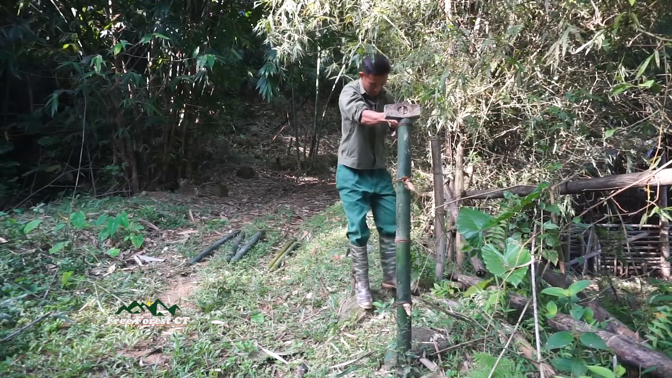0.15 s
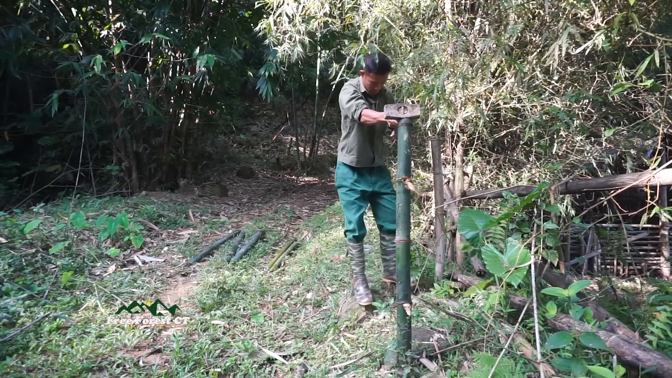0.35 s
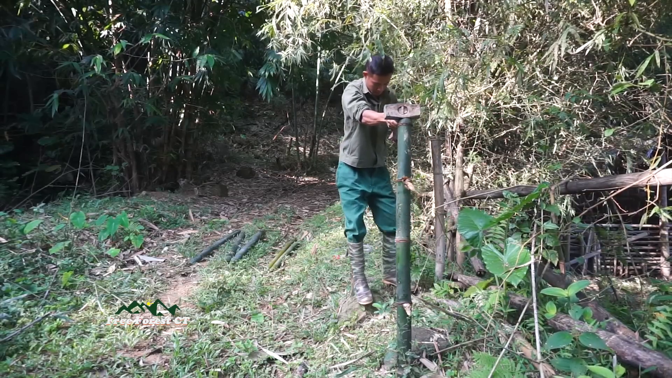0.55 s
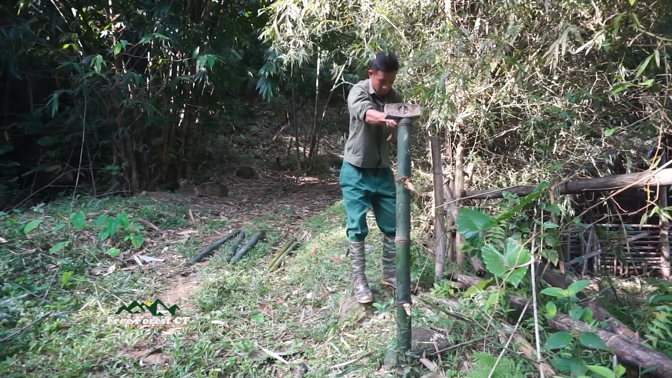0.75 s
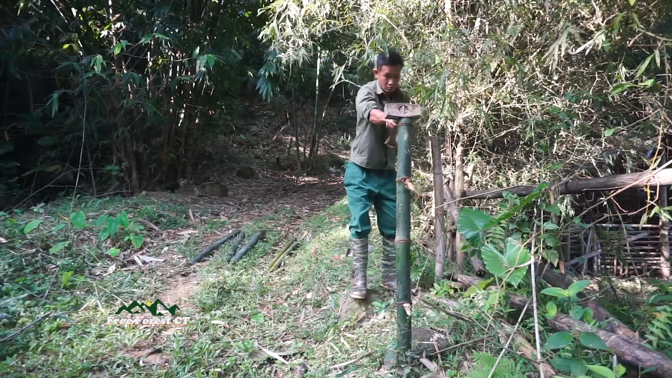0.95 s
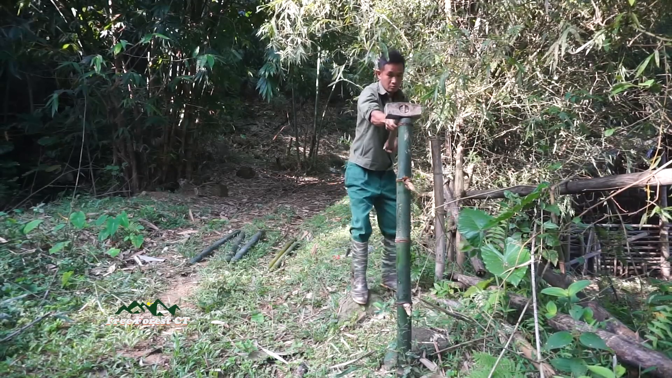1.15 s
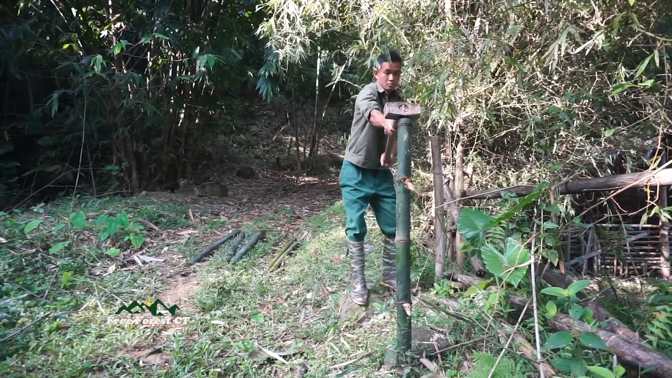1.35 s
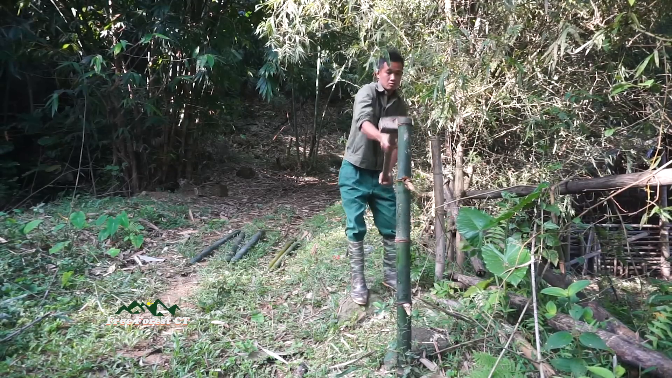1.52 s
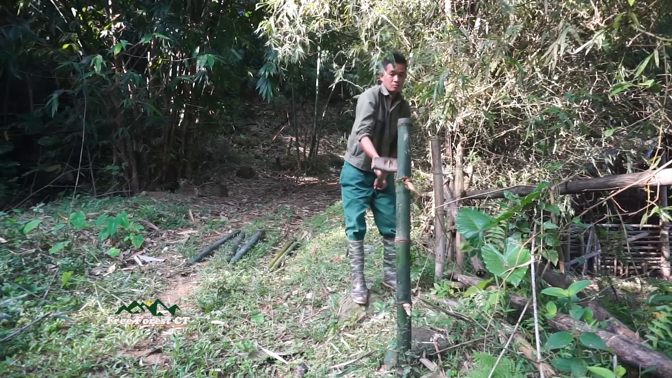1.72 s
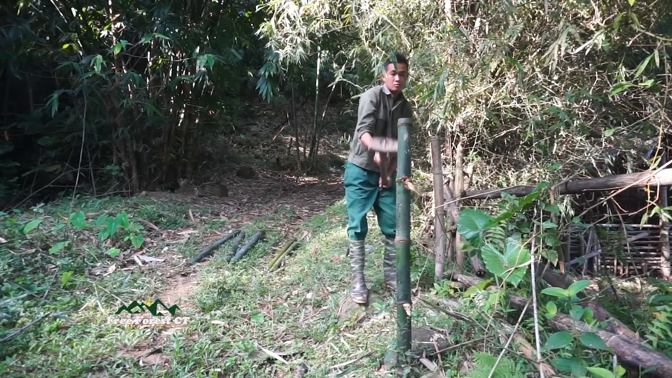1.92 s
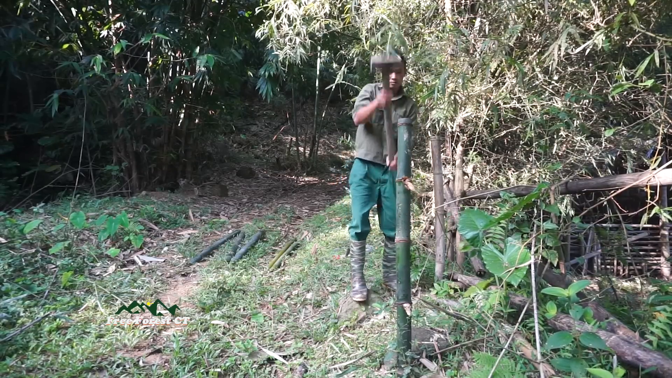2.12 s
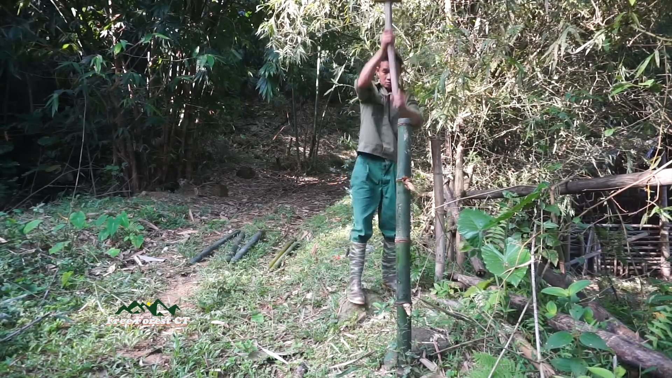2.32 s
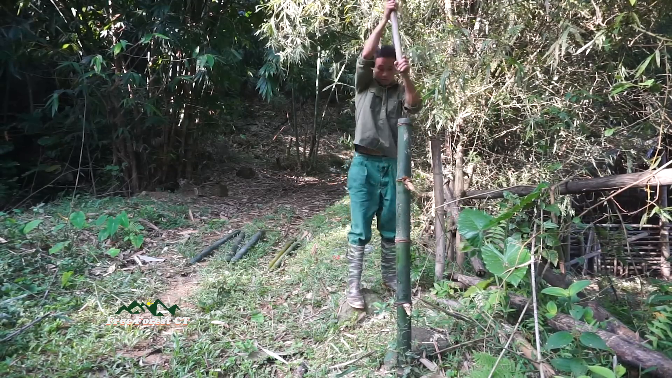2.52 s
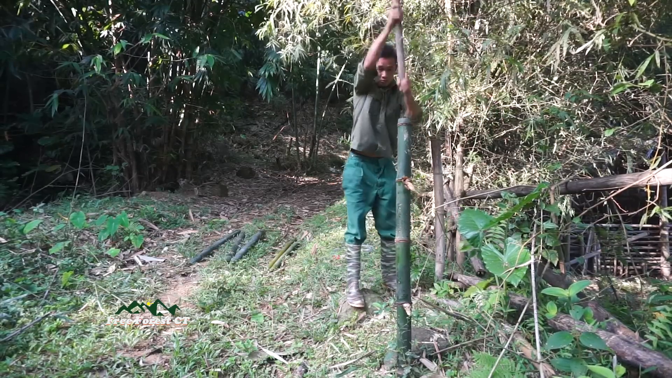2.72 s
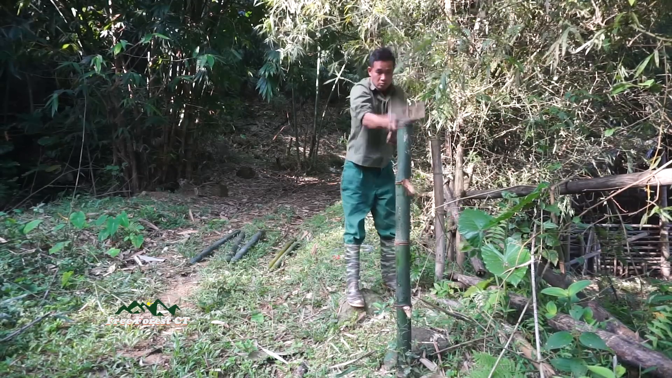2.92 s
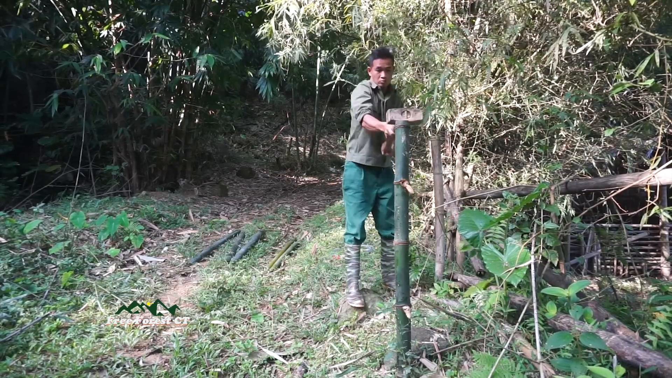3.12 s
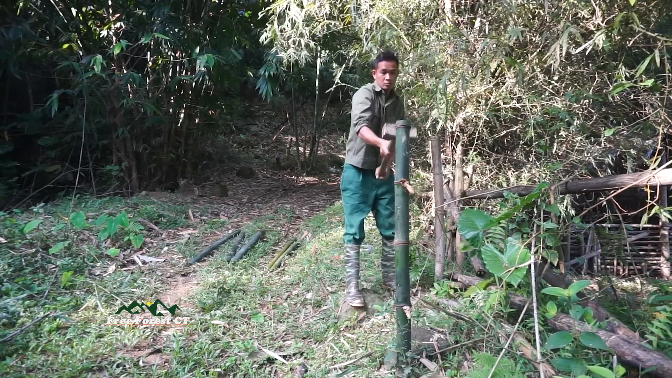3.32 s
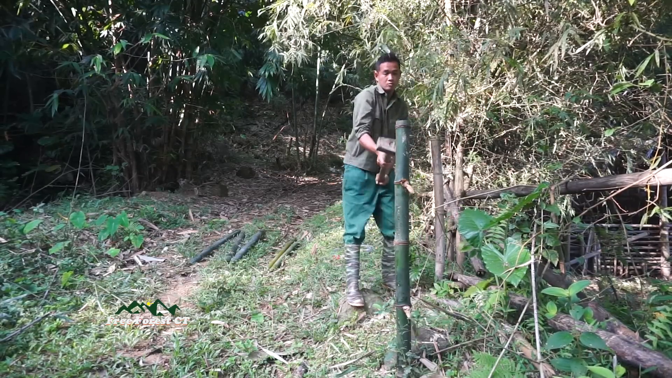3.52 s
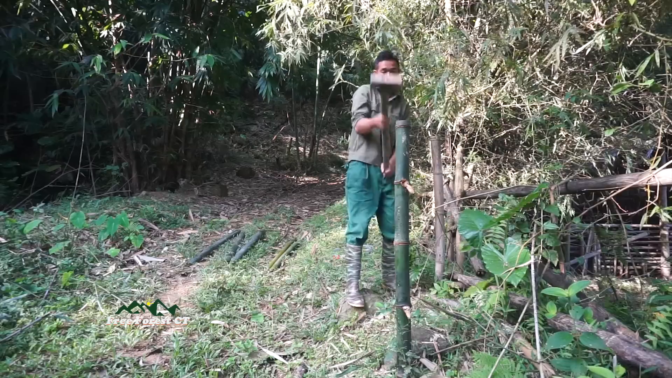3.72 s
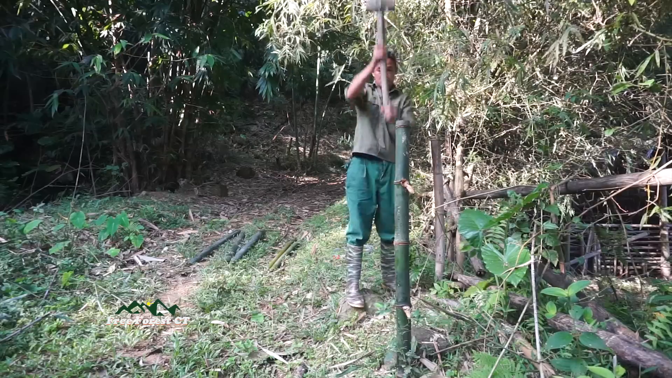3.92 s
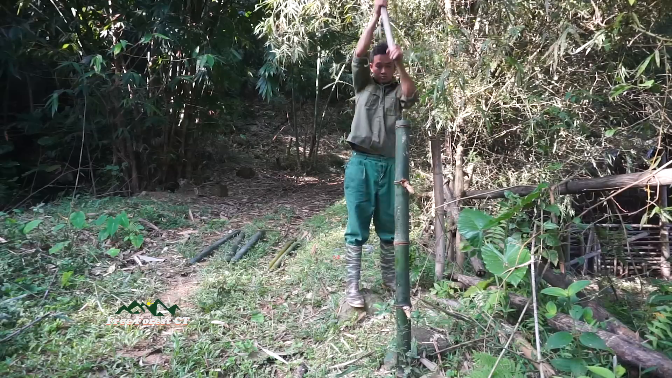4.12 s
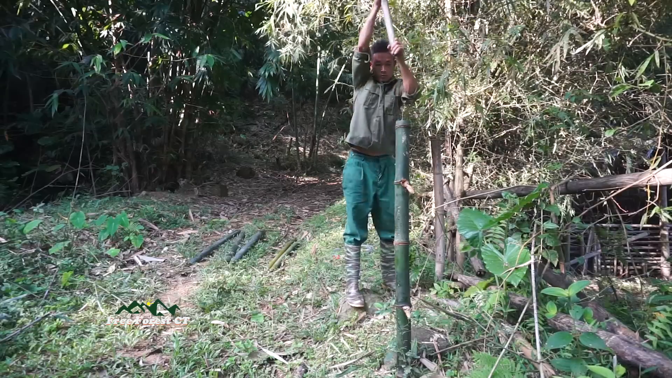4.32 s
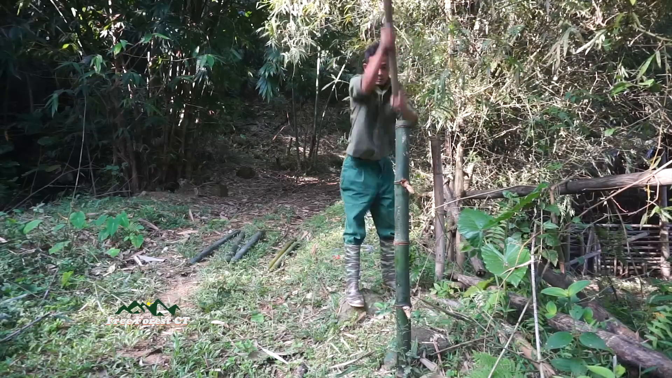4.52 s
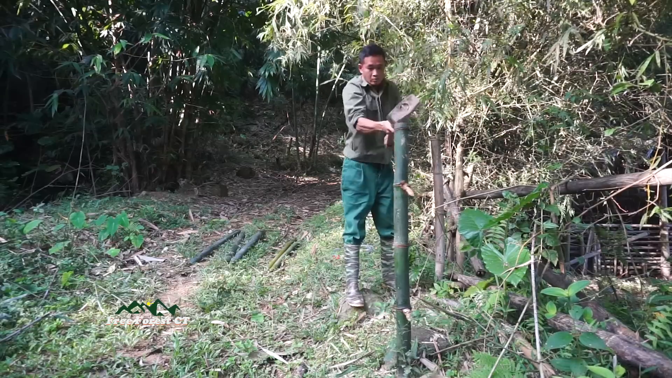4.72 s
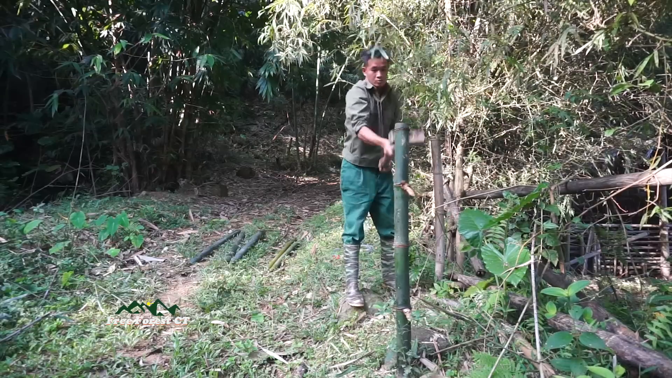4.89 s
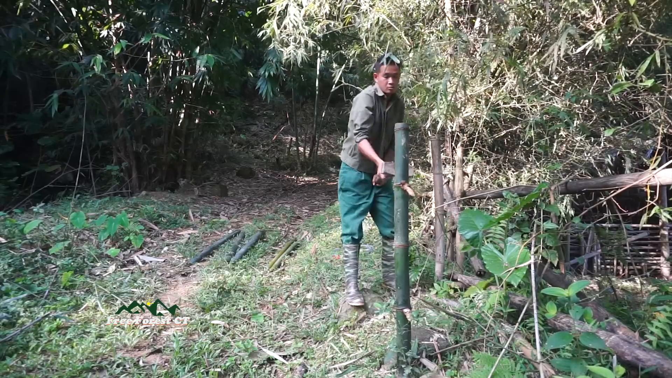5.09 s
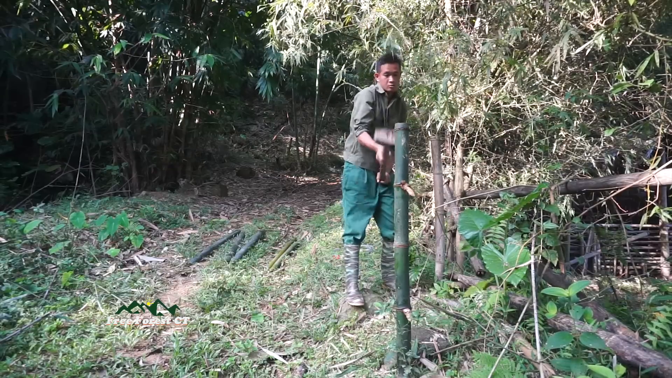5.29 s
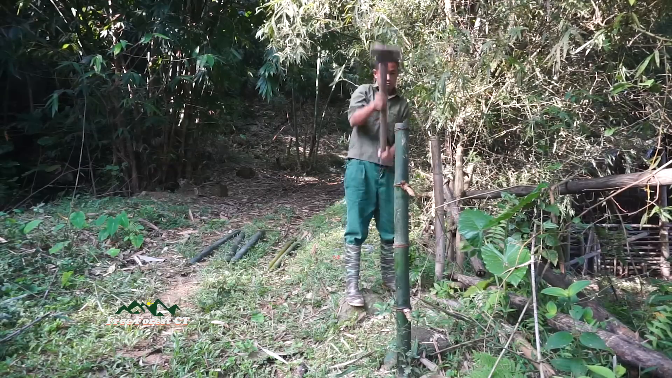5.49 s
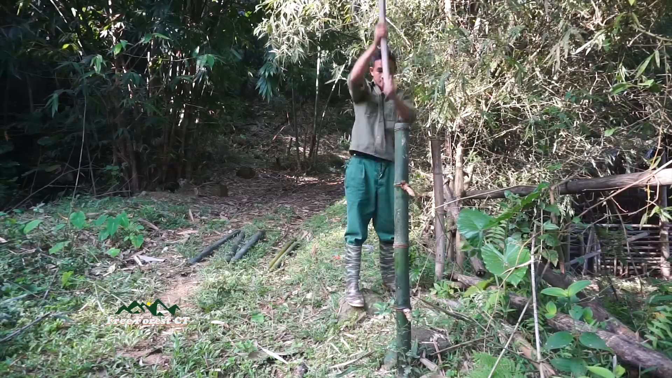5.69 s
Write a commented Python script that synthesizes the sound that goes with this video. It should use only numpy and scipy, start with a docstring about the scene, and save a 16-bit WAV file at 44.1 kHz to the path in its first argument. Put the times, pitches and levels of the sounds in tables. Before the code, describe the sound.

A clearing beside a bamboo grove, heard in stereo for about 5.7 seconds. A thin, steady high drone of cicadas continues throughout, with even higher bush crickets pulsing about four times a second, a soft wash of leaves and water, and small distant gurgles popping at uneven intervals. A faint sleeve rustle comes at 0.3 s; light ticks and more cloth sound at 2.4 to 2.8 s. At 3.0 s a steel-headed tool hits the hollow pole: a sharp, dry crack and short woody knock, a high wavering metallic ring, and a hissy echo that swells from the stems and fades within about half a second. Dull thumps follow at 3.1 s. The background dips, then slowly recovers. Rustle and faint ticks return near 4.2 s, a second, similar blow lands at 4.7 s, with a soft thump at 4.85 s. A faint, rising insect-like hum and slight rustle appear after 5.6 s.

```python
"""Bamboo pole driven in at the edge of a grove

Two blows of a steel-headed tool drive a green bamboo pole into the ground, heard through two close microphone ports.
Each blow cracks (bursts of noise), knocks the hollow pole (struck modes) and sets the steel ringing (a beating sine);
the stems of the grove throw back a swelling echo. Cicadas drone and bush crickets pulse as throbbing bands of noise,
water gurgles far off as ringing bubbles, sleeves rustle with arm movements, and a faint hum comes up near the end.
"""
import sys
import numpy as np
from scipy import signal
from scipy.fft import rfft, irfft
from scipy.io import wavfile
from scipy.ndimage import uniform_filter1d

SR = 44100
rng = np.random.default_rng(int(sys.argv[2]) if len(sys.argv) > 2 else 0)


def materialize(psi):
    """Save the field psi as 16-bit PCM at rate SR to the path in sys.argv[1].

    A 1-D psi becomes a single channel; in a 2-D psi each row is a channel.
    """
    bounded = np.clip(np.atleast_2d(psi).T, -1, 1)
    quanta = np.round(bounded * 32767).astype(np.int16)
    wavfile.write(sys.argv[1], SR, quanta)


N = 253575
TIME = np.arange(N) / SR                                    # s
FREQS = np.maximum(np.arange(N // 2 + 1) * SR / N, 1)       # Hz

# Contacts of the head on the pole. Each row: start in seconds, knock level in dB,
# brightness of the contact in Hz, level of the crunching fibres in dB.
CONTACTS = [(2.9891, -8.5, 6240, -23.5), (2.9916, 0.5, 1350, -36.5), (2.9970, -10, 1400, -61),
            (4.6997, -3.5, 5970, -26), (4.7020, -3, 1480, -33.5), (4.7073, -8, 1400, -36.5)]
# Modes of the hollow pole. Each row: frequency in Hz, level in dB, t60 in seconds.
POLE_MODES = [(219, -38, 0.039), (274, -32.5, 0.087), (434, -28, 0.054), (503, -24, 0.069),
              (570, -24, 0.075), (667, -19.5, 0.08), (796, -27.5, 0.067), (1032, -18.5, 0.1),
              (1283, -18.5, 0.059), (1357, -16.5, 0.023), (1540, -30, 0.015), (1967, -24, 0.099),
              (2247, -23, 0.064), (2420, -22.5, 0.027), (3400, -32, .025)]
# Colour of the splintering fibres heard directly. Each row: frequency in Hz, relative level in dB per Hz.
CRUNCH_COLOUR = [(40, -32), (150, 2.5), (400, -11), (1200, 0.5), (2400, 2.5), (3500, 1.5), (5000, -5),
                 (7000, -1), (9000, -15), (11000, -14)]
# Colour of the splintering as the grove returns it. Each row: frequency in Hz, relative level in dB per Hz.
GROVE_COLOUR = [(60, -29), (150, -15), (330, -21), (480, -13.5), (750, -8.5), (920, -5), (1320, 3),
                (1650, 0), (2450, 2), (3000, 0), (5000, -4), (7000, -7.5), (9000, -12), (11000, -14)]
# Singing of the steel head after each blow.
# Each row: start in seconds, peak level in dB, t60 in seconds, depth of its beating in dB.
STEEL_RINGS = [(2.99, -22.5, 0.89, 1.5), (4.6985, -28.5, 0.82, 3.5)]
STEEL_HZ, STEEL_BEATS_PER_S = 7035, 15   # the moving head beats against its echo
STEEL_DIRECT = 0.013   # weight of the direct power, where the whole echo has weight 1
# Dull thumps as the tool settles. Each row: start in seconds, level of the push in dB before softening.
THUMPS = [(3.0858, 10.5), (3.114, 1), (4.852, -6)]
# Light ticks as the blade is set on the pole. Each row: start in seconds, level in dB, t60 in seconds.
TICKS = [(2.4512, -27, 0.03), (2.4565, -30, 0.022), (2.4625, -36, 0.16), (2.7105, -41.5, 0.13),
         (4.1475, -34, 0.039), (4.331, -37, 0.023)]
# Colour of the ticks. Each row: frequency in Hz, relative level in dB per Hz.
TICK_COLOUR = [(200, -29), (1200, -7), (2800, -2), (6500, 3), (9000, 5), (11000, 6)]
# Arm movements that rustle the sleeves. Each row: middle in seconds, level in dB, length in seconds.
ARM_MOVES = [(0.31, -57, .2), (2.388, -47, 0.29), (2.777, -51.5, 0.15), (4.156, -48.5, 0.43),
             (5.674, -52, .2)]
# Colour of rubbing cloth. Each row: frequency in Hz, relative level in dB per Hz.
CLOTH_COLOUR = [(60, -19), (200, -0.5), (700, 9.5), (2000, -0.5), (4000, 2.5), (6500, 7.5), (11000, 9)]
# Droning cicadas. Each row: frequency in Hz, width in Hz, level in dB, buzzes per second, buzz depth 0-1.
CICADAS = [(4649, 220, -53, 30, 0.067), (7075, 490, -60.5, 100, 0.05)]
# Bush crickets. Each row: frequency in Hz, width in Hz, level in dB.
CRICKETS = [(9420, 740, -55.5), (8845, 980, -55.5)]
# Their rhythm. Each row: chirps per second, middle of a chirp in seconds, tooth strikes per second,
# level between chirps 0-1.
CRICKET_RHYTHM = [(4.56, .19, 73, .08), (4.12, .15, 72, .6)]
# Hollows in which the distant water rings. Each row: frequency in Hz, level in dB.
HOLLOWS = [(320, -72), (410, -71), (510, -68.5), (720, -79), (900, -78), (1140, -73), (1350, -71.5)]
# Loudest gurgles. Each row: start in seconds, level in dB, pitch in Hz.
GURGLES = [(0.144, -48.5, 1147), (0.564, -46, 1130), (0.824, -48.5, 330), (1.001, -41, 1118),
           (1.35, -43.5, 1066), (1.708, -47.5, 1160), (1.842, -48.5, 1395), (2.036, -44, 413),
           (2.75, -46, 1115), (3.62, -44, 1155), (5.12, -44, 1120), (5.568, -44, 1134)]
# Lesser gurgles at random in the two main hollows. Each row: pitch in Hz, gurgles per second, level in dB.
LESSER_GURGLES = [(1116, 2.0, -48), (394, 0.92, -53.5)]
GURGLE_SPREAD_DB, GURGLE_DETUNE = 1.5, 0.049   # their largest scatter in level and, as a share, in pitch
# Colour of the steady wash of water and leaves. Each row: frequency in Hz, relative level in dB per Hz.
WASH_COLOUR = [(30, -21), (70, -16), (130, -15), (200, -8.5), (320, 5), (600, 5), (1200, 3), (1700, 3.5),
               (2300, 4.5), (3500, 2.5), (6000, -3.5), (8000, -10), (10000, 8), (11000, -6)]
# Course of the faint hum. Each row: time in seconds, swell in dB, pitch in Hz.
HUM_SWELL = [(5.56, -61, 483.5), (5.62, -5, 499.6), (5.67, -2.5, 510), (5.75, 0, 517)]
# Harmonics of the hum from the fundamental up. Each entry: level in dB.
HUM_HARMONICS = [-56, -53.5, -65, -59.5]
# Phase between the microphone ports. Each row: frequency in Hz, lag of the left port in radians.
PORT_LAG = [(20, .2), (130, 0.97), (340, 1.5), (700, 2), (3500, 1.73), (9000, 1.6)]
# Balance of the microphone ports. Each row: frequency in Hz, left minus right in dB.
PORT_BALANCE = [(100, .3), (350, 1.1), (620, 2.5), (1100, 3.8), (2000, 5), (3600, 8), (7000, 8.4),
                (11000, 10)]


def from_db(db):
    """Decibels to gain."""
    return 10 ** (np.asarray(db) / 20)


def rms_one(x):
    """Scale to unit power."""
    return x / np.sqrt(np.mean(x ** 2) + 1e-20)


def at_hz(points, hz=FREQS):
    """Read a table along a log-frequency axis."""
    table_hz, value = np.transpose(points)
    return np.interp(np.log(hz), np.log(table_hz), value)


def shaped(x, gain):
    """Filter by a gain per frequency."""
    return irfft(rfft(x) * gain, N)


def noise(gain, apart_db=-15):
    """Noise of unit power at both ports: a shared part plus separate parts at apart_db."""
    white = rng.standard_normal(N) + from_db(apart_db) * rng.standard_normal((2, N))
    return rms_one(shaped(white, gain))


def drift(rate_hz):
    """Random wander of unit power that weakens above rate_hz."""
    hz = FREQS[FREQS < 700]
    spectrum = rng.standard_normal((len(hz), 2)) @ [1, 1j]
    return rms_one(irfft(spectrum / (1 + (hz / rate_hz) ** 2), N))


def turning(hz):
    """Phase in radians of a tone whose frequency may move."""
    return 2 * np.pi * np.cumsum(hz) / SR


def resonance(hz, width_hz):
    """Bell-shaped gain around one frequency."""
    return 1 / (1 + (2 * (FREQS - hz) / width_hz) ** 2 / 2)


def ring(force, hz, t60):
    """A unit click sets a sine of height 1 ringing."""
    radius = from_db(-60 / (t60 * SR))
    angle = 2 * np.pi * hz / SR
    poles = [1, -2 * radius * np.cos(angle), radius * radius]
    return signal.lfilter([0, np.sin(angle)], poles, force + 1e-18)


def dying(start_s, t60):
    """Envelope that starts at 1 and falls 60 dB in t60 seconds."""
    return (TIME >= start_s) * np.exp(-np.log(1000) * np.clip((TIME - start_s) / t60, 0, 10))


def thin(x, low_cut_hz=200, full_db=-22):
    """The bass below low_cut_hz is cut away; a faint share of the full sound remains."""
    high_pass = signal.butter(4, low_cut_hz, "high", fs=SR, output="sos")
    return from_db(full_db) * x + signal.sosfilt(high_pass, x + 1e-18)


def blows(knock_echo_db=-5, crunch_echo_db=10, low_t60=0.65, high_t60=0.43, split_hz=4500):
    """Knock and crunch arrive directly, then as a swelling echo whose treble the leaves swallow first."""
    knock, splinter = pole()
    direct = knock + splinter * noise(from_db(at_hz(CRUNCH_COLOUR)), apart_db=-45)
    hiss = noise(from_db(at_hz(GROVE_COLOUR)), apart_db=-10)
    low = shaped(hiss, 1 / (1 + (FREQS / split_hz) ** 4))
    crunch_echo = 0
    for band, t60 in [(low, low_t60), (hiss - low, high_t60)]:
        # the splintering is noise, so its echoes add up in power
        power = signal.fftconvolve(splinter ** 2, grove(t60) ** 2)[:N]
        crunch_echo = crunch_echo + band * np.sqrt(np.abs(power))
    clumps = from_db(1.2 * drift(150))
    echo = from_db(crunch_echo_db) * clumps * crunch_echo + from_db(knock_echo_db) * scattered(knock)
    return thin(direct + echo)


def pole(crunch_t60=0.056, crack_t60=0.0035, crack_db=7):
    """The head crushes the rim and seats itself: ring of the pole's modes and strength of the splintering."""
    force, splinter = np.zeros(N), np.zeros(N)
    for start_s, knock_db, bright_hz, crunch_db in CONTACTS:
        push = dying(start_s, np.log(1000) / (2 * np.pi * bright_hz))   # a softer contact lasts longer
        force += from_db(knock_db) * push / push.sum()
        tearing = dying(start_s, crunch_t60) + from_db(crack_db) * dying(start_s, crack_t60)
        splinter += from_db(crunch_db) * tearing
    knock = np.zeros(N)
    for k, (hz, db, t60) in enumerate(POLE_MODES):
        knock += (-1) ** k * from_db(db) * ring(force, hz, t60)   # neighbouring modes have opposite signs
    return knock, splinter


def grove(t60, swell_s=0.058, steepness=3.2, near=0.32, late_db=-24, late_t60=1.5):
    """Envelope of the echo, unit energy: little comes from near by, most from the wall of stems."""
    t = TIME[:int(1.2 * SR)]
    reached = near + 1 - np.exp(-(t / swell_s) ** steepness)
    early = np.exp(-np.log(1000) * t / t60)
    late = from_db(late_db) * np.exp(-np.log(1000) * t / late_t60)
    envelope = reached * (early + late)
    return envelope / np.sqrt(np.sum(envelope ** 2))


def scattered(x, t60=0.4):
    """Countless stems each return a faint copy of the sound."""
    envelope = grove(t60)
    stems = noise(1, apart_db=4)[:, :len(envelope)] * envelope
    return signal.fftconvolve(np.atleast_2d(x), stems, axes=1)[:, :N]


def steel(waver_hz=4, echo_t60=0.49):
    """One high mode of the head dies away; its echoes pile up into a swell and beat against it."""
    echoes, loud = grove(echo_t60) ** 2, 0
    for start_s, db, t60, beat_db in STEEL_RINGS:
        power = dying(start_s, t60) ** 2
        heard = np.abs(STEEL_DIRECT * power + signal.fftconvolve(power, echoes)[:N])
        beats = np.sin(turning(STEEL_BEATS_PER_S * (1 + 0.406 * drift(9.7))))
        loud = loud + from_db(db + beat_db * beats) * np.sqrt(heard / heard.max())
    return loud * np.sin(turning(STEEL_HZ + waver_hz * drift(23.7)))


def thumps(soft_hz=900):
    """Soft, heavy contacts: a single low-passed push each, with no crack."""
    force = np.zeros(N)
    for start_s, db in THUMPS:
        force[round(start_s * SR)] = from_db(db)
    low_pass = signal.butter(2, soft_hz, fs=SR, output="sos")
    return thin(signal.sosfilt(low_pass, force + 1e-18))


def blade_ticks(echo_db=-11):
    """Light contacts: short dying bursts of bright noise, with their echo from the stems."""
    envelope = sum(from_db(db) * dying(start_s, t60) for start_s, db, t60 in TICKS)
    direct = thin(envelope * noise(from_db(at_hz(TICK_COLOUR))))
    return direct + from_db(echo_db) * scattered(direct)


def sleeves(rough_db=1.0):
    """Cloth rubs harder as the arms speed up and fades as they slow."""
    effort = np.zeros(N)
    for middle_s, db, length_s in ARM_MOVES:
        effort += from_db(db) * np.exp(-2 * ((TIME - middle_s) / length_s) ** 2)
    return effort * from_db(rough_db * drift(50)) * noise(from_db(at_hz(CLOTH_COLOUR)))


def buzz(per_s, depth, unsteady=0.026):
    """Throb of a tymbal or wing at a slightly unsteady rate."""
    return 1 + depth * np.sin(turning(per_s * (1 + unsteady * drift(3.6))))


def cicadas(waver_db=0.1):
    """Tymbals buzz through body resonances: throbbing bands of noise."""
    out = 0
    for hz, width_hz, db, per_s, depth in CICADAS:
        level = from_db(db + waver_db * drift(5.6))
        out = out + level * buzz(per_s, depth) * noise(resonance(hz, width_hz), apart_db=-4.5)
    return out


def bush_crickets():
    """Wing strokes rasp a band of noise; the two chirp at different rates and drift out of step."""
    out = 0
    for (hz, width_hz, db), (per_s, middle_s, strikes_per_s, rest) in zip(CRICKETS, CRICKET_RHYTHM):
        stroke = np.cos(np.pi * per_s * (TIME - middle_s)) ** 2
        rasp = buzz(strikes_per_s, .3) * noise(resonance(hz, width_hz) ** 2, apart_db=-4)
        out = out + from_db(db) * (rest + (1 - rest) * stroke) * rasp
    return out


def water(per_s=30, size_db=4, hollow_q=9, gurgle_s=0.0035, rise_per_s=0.74):
    """Bubbles burst at random in a few hollows; the big ones swell, rise in pitch and die."""
    out = np.zeros(N)
    for hz, db in HOLLOWS:
        size = from_db(size_db * np.minimum(rng.exponential(1, N), 3))
        pops = (rng.random(N) < per_s / SR) * size * rng.choice([-1, 1], N)
        ringing = ring(pops, hz, 2 * hollow_q / hz)
        out += from_db(db) * rms_one(shaped(ringing, resonance(hz, hz / 2)))
    age = TIME[:SR // 10]
    swell = age / gurgle_s * np.exp(1 - age / gurgle_s)   # peaks at 1 after gurgle_s
    for start_s, db, hz in list(GURGLES) + lesser_gurgles():
        phase = 2 * np.pi * hz * age * (1 + rise_per_s * (age / 2 - gurgle_s))
        gurgle = from_db(db) * swell * np.sin(phase)
        span = out[max(round(start_s * SR), 0):][:len(age)]
        span += gurgle[:len(span)]   # adds into out
    return out


def lesser_gurgles():
    """Rows of (s, dB, Hz): bubbles at uneven intervals, each a little off the pitch of its hollow."""
    rows = []
    for hz, per_s, db in LESSER_GURGLES:
        for k, (late, size, detune) in enumerate(rng.uniform(-1, 1, size=(40, 3))):
            start_s = (k + (1 + late) / 2) / per_s
            rows.append((start_s, db + GURGLE_SPREAD_DB * size, hz * (1 + GURGLE_DETUNE * detune)))
    return rows


def trickle(hz=1140, width_hz=140, db=-65):
    """A steady run of water keeps one hollow sounding."""
    surge = from_db(3.5 * drift(14))
    return from_db(db) * surge * noise(resonance(hz, width_hz))


def hum(waver=0.0035):
    """A faint, wavering hum, perhaps a bee flying near: harmonics of one gliding pitch."""
    time_s, swell_db, hz = np.transpose(HUM_SWELL)
    phase = turning(np.interp(TIME, time_s, hz) * (1 + waver * drift(12)))
    tone = sum(from_db(db) * np.sin(k * phase) for k, db in enumerate(HUM_HARMONICS, 1))
    return from_db(np.interp(TIME, time_s, swell_db)) * tone


def forest_wash(db=-55.5):
    """Water and leaves merge into a steady, slightly wavering noise."""
    return from_db(db + 1.4 * drift(21)) * noise(from_db(at_hz(WASH_COLOUR)), apart_db=-11.0)


def leftward(db):
    """Channel gains that make the left db louder than the right; negative leans right."""
    return from_db(np.array([[db], [-db]]) / 2)


def scene(insects_left_db=2.2, wash_left_db=-2.5, water_left_db=0.0):
    """The work and its echo in front of the steady forest."""
    work = blows() + blade_ticks() + steel() + thumps() + sleeves()
    insects = (cicadas() + bush_crickets()) * leftward(insects_left_db)
    distant_water = (water() + trickle()) * leftward(water_left_db)
    return work + insects + distant_water + forest_wash() * leftward(wash_left_db) + hum()


def gain_control(x, threshold_db=-34, share=0.21, release_db_per_s=3.5, attack_s=0.0059):
    """A loud sound turns the gain down by a share of its excess; the gain then creeps back."""
    power = uniform_filter1d(np.mean(x ** 2, axis=0), size=256)
    loud_db = 10 * np.log10(np.abs(power) + 1e-12)
    over_db = share * np.maximum(loud_db - threshold_db, 0)
    released_db = release_db_per_s * TIME
    held_db = np.maximum.accumulate(over_db + released_db) - released_db
    r = np.exp(-1 / (attack_s * SR))
    return x * from_db(-signal.lfilter([1 - r], [1, -r], held_db))


def record(dry, wind_cut_hz=70, cutoff_hz=11100):
    """Two close ports turn the phase between channels and favour the left; gain control; bass and top are cut."""
    half = from_db(at_hz(PORT_BALANCE) / 2) * np.exp(-.5j * at_hz(PORT_LAG))
    ports = np.array([half, 1 / half])
    ports = ports / np.abs(ports.mean(axis=0))   # a sound equal at both ports keeps its level in the mono sum
    heard = gain_control(shaped(dry, ports))
    heard = signal.sosfilt(signal.butter(2, wind_cut_hz, "high", fs=SR, output="sos"), heard)
    return signal.sosfilt(signal.ellip(12, .1, 80, cutoff_hz, fs=SR, output="sos"), heard)


dry = scene()
out = record(dry)
materialize(out)
```